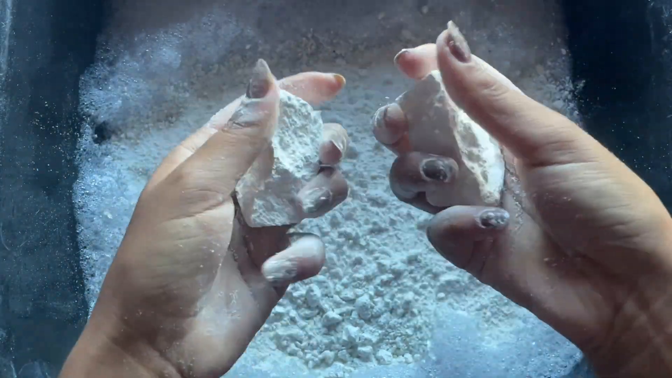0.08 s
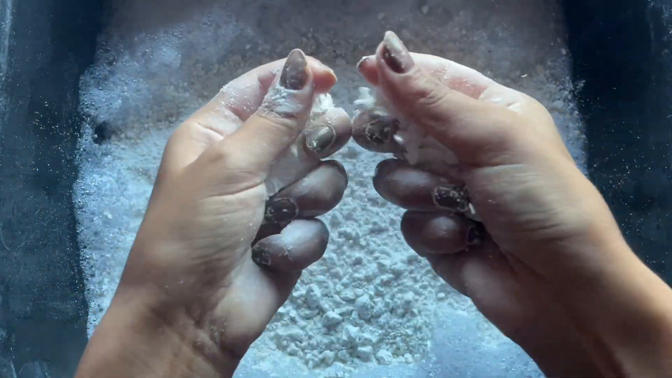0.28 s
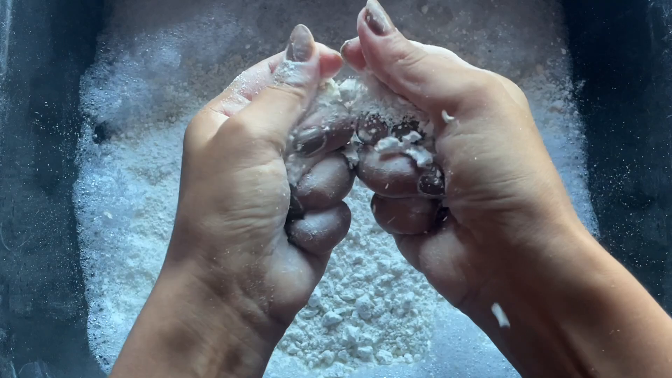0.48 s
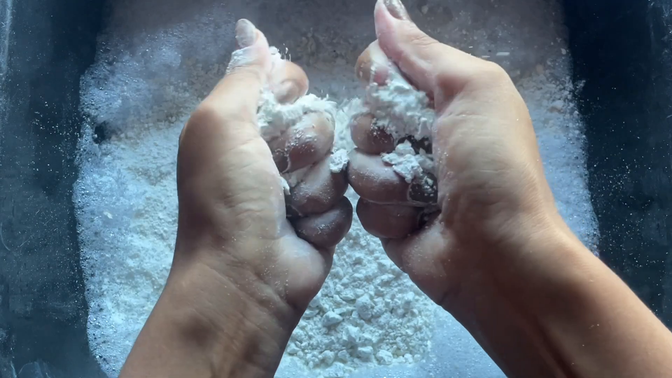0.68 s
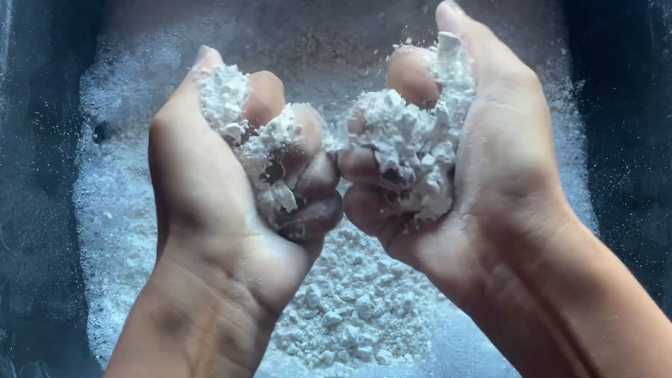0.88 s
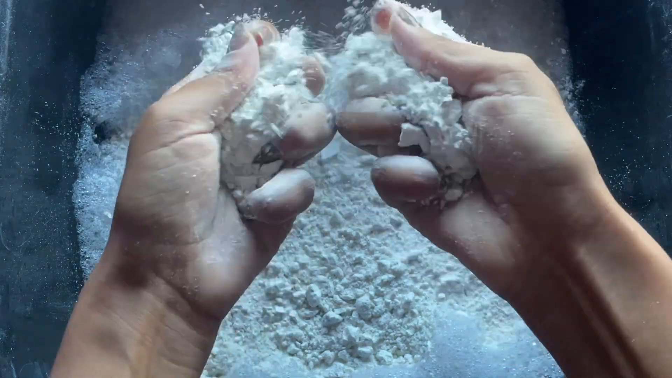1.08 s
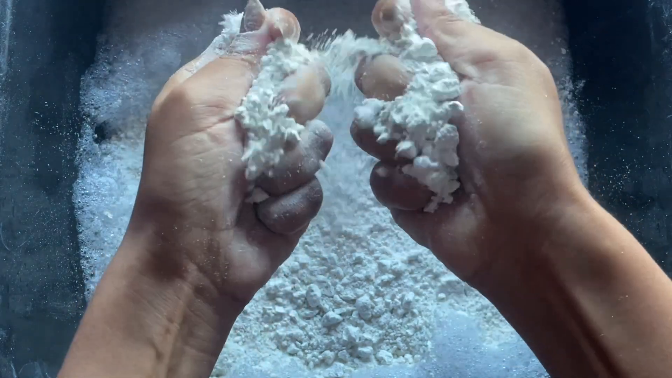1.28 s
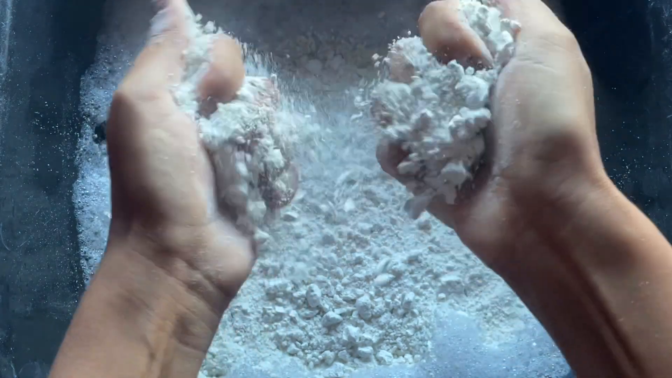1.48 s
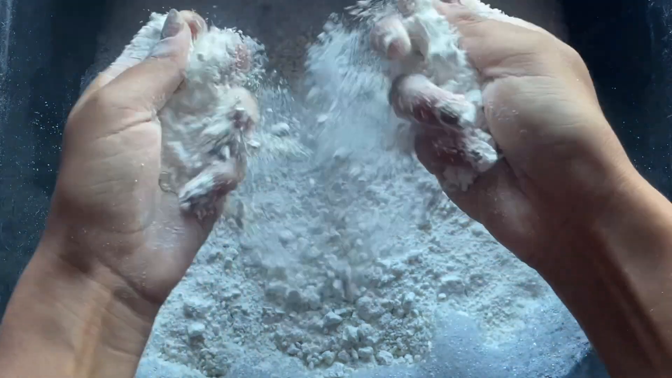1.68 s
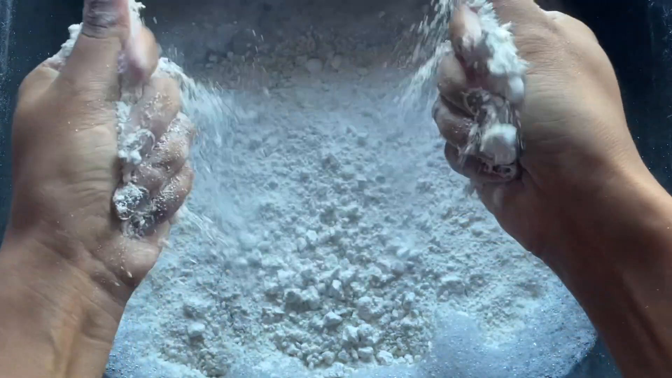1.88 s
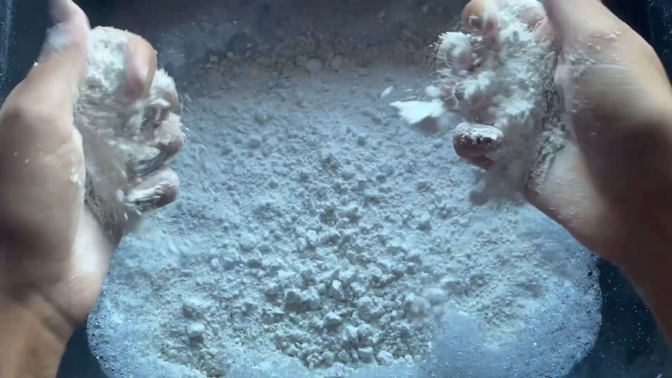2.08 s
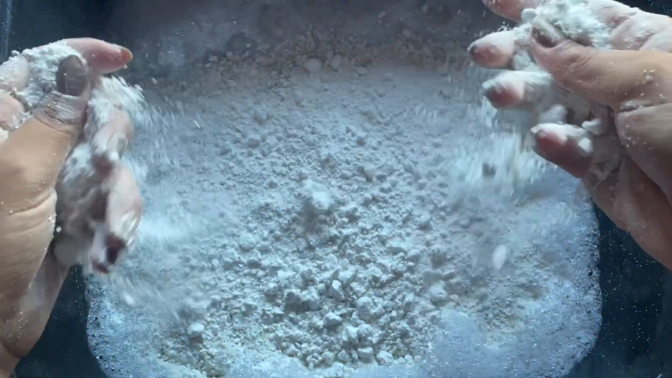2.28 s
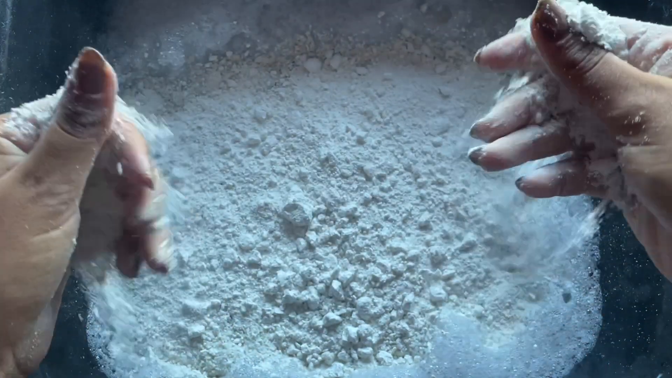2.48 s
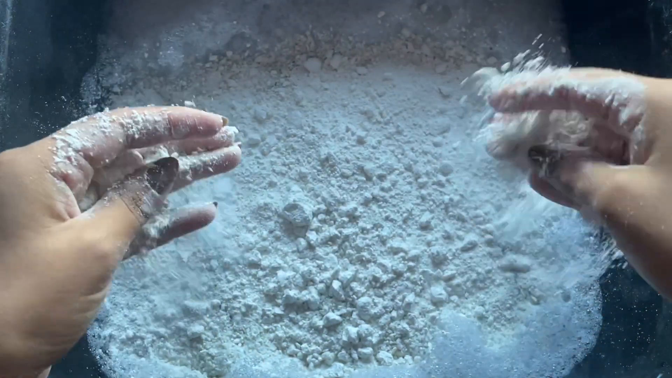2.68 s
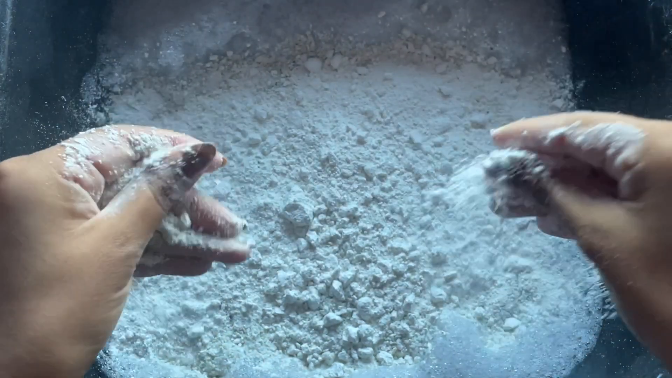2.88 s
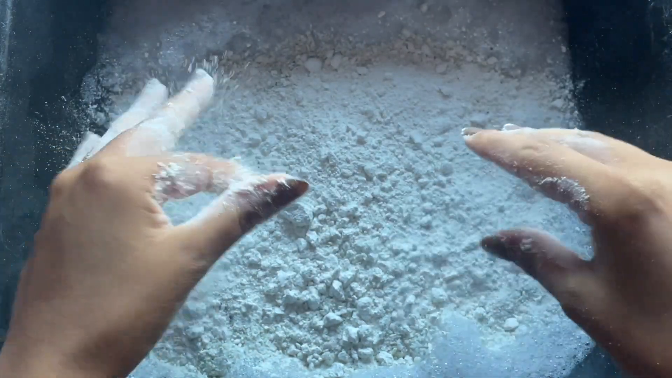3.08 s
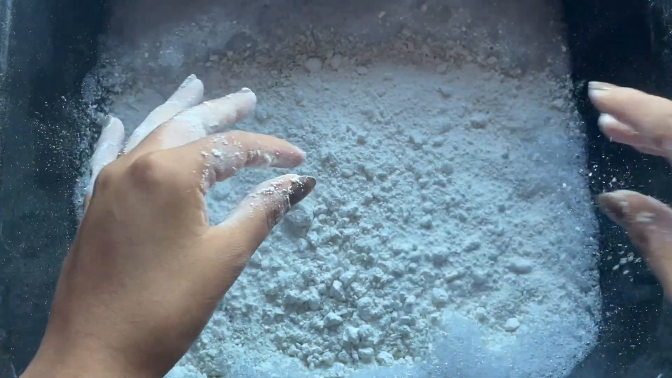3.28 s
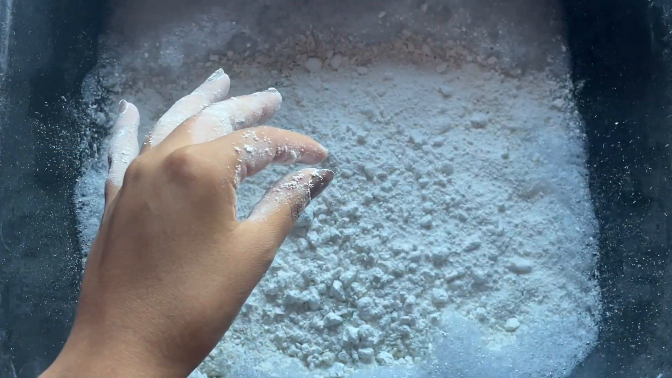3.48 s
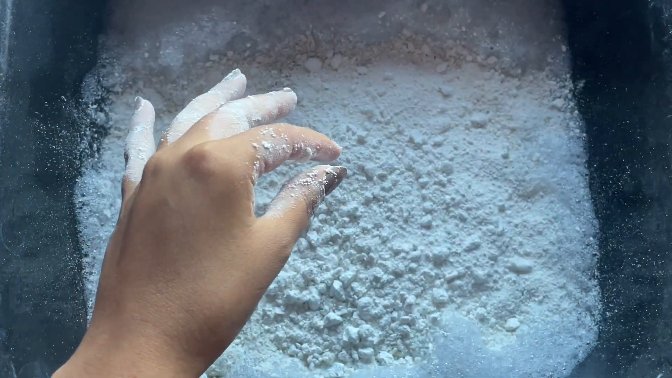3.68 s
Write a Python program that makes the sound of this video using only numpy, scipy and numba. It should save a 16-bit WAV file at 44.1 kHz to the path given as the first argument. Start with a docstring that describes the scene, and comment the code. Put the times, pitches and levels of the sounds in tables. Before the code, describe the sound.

Crunchy snaps of powder clumps come first, a few softer cracks follow, then a grainy rush of falling powder with crackle and low thumps, heard close in a small room.

```python
"""Clumps of damp powder snap, then crumble and sift down while foamy paste fizzes on beneath them.
Crumbs patter on the heap and heavier lumps land with muffled thumps, in a small room, close to the microphone.
Foam, sifting, patter and rubbing are showers of tiny fading tones; crackle is clicks and a puff is shaped hiss.
Each snap is a burst of noise that rings a clump, followed by a knock; thumps are low swinging tones over a rumble.
"""
import sys
import numpy as np
from scipy import signal
from scipy.fft import rfft, irfft, next_fast_len
from scipy.io import wavfile
from scipy.ndimage import uniform_filter1d
from numba import njit

SR = 44100
rng = np.random.default_rng(int(sys.argv[2]) if len(sys.argv) > 2 else 0)


def waveform_to_disk(signal):
    """Save audio, clipped to [-1, 1], as 16-bit WAV at the path in sys.argv[1]."""
    frames = np.transpose(np.atleast_2d(signal))
    scaled = np.clip(frames, -1, 1) * 32767
    samples = np.round(scaled).astype(np.int16)
    wavfile.write(sys.argv[1], SR, samples)


N = 165375  # length in samples

# In every colour table the dB are relative: only the shape of the curve counts.
# Bursting foam bubbles. Each row: frequency in Hz, colour in dB.
FOAM_COLOUR = [(200, -16.5), (700, -13.5), (1200, -4.5), (2100, 1.5), (3500, -3.5), (5000, -9), (7000, -20),
               (10000, -25.5), (14000, -57)]
FOAM_DB, FOAM_POPS_PER_S, FOAM_SPREAD_DB = -54.5, 6000, 3.5

# Low rumble of the tub. Each row: time in seconds, level in dB.
RUMBLE_LEVEL = [(0, -57.5), (.35, -51.5), (.8, -56.5), (1.3, -54), (2.0, -53.5), (2.9, -57), (3.4, -51.5),
                (3.75, -60.5)]
# Colour of that rumble. Each row: frequency in Hz, colour in dB.
RUMBLE_COLOUR = [(15, -44), (32, -14), (48, -2.5), (64, 0.5), (90, -8), (140, -12), (210, -18.5),
                 (500, -40), (2000, -52.5)]
RUMBLE_SIDE_DB = -15.5  # left-right difference, relative to the shared part

# Crumbs pattering on the heap. Each row: time in seconds, level in dB.
PATTER_LEVEL = [(0, -64), (.19, -68.5), (.3, -57), (.45, -64), (.62, -64), (.8, -61), (.96, -60.5),
                (1.19, -53), (1.44, -58), (1.66, -55.5), (1.98, -54), (2.15, -61), (2.28, -49.5),
                (2.55, -50.5), (2.9, -64), (3.22, -55.5), (3.48, -68.5), (3.75, -63.5)]
# Colour of the patter. Each row: frequency in Hz, colour in dB.
PATTER_COLOUR = [(100, -14.5), (220, -6.5), (310, -3), (420, -3.5), (560, -2.5), (720, -7.5), (1300, -14),
                 (3000, -21), (9000, -76)]

# Palms rubbing the damp powder. Each row: time in seconds, level in dB, pitch of their hollow in Hz.
RUBBING = [(0, -70.5, 395), (.5, -77, 380), (.63, -59.5, 385), (.9, -74, 410), (1.25, -65, 433),
           (1.36, -57.5, 338), (1.52, -64, 442), (1.72, -58.5, 392), (2.0, -59, 409), (2.45, -77, 413),
           (2.8, -56.5, 440), (2.9, -66, 502), (2.98, -55, 554), (3.1, -60.5, 543), (3.2, -54.5, 445),
           (3.5, -100, 524)]
# How slowly a slip fades (in cycles), slips per second, and pitch scatter (as a fraction, roughly).
RUB_CYCLES, RUB_SLIPS_PER_S, RUB_PITCH_SCATTER = 8, 600, .05

# A wisp of dust as the fingers close: middle and width in seconds, level in dB.
PUFF_S, PUFF_WIDTH_S, PUFF_DB = 0.067, 0.013, -62
# Hiss of the finest dust. Each row: frequency in Hz, colour in dB.
FINE_DUST_COLOUR = [(2000, -30), (5000, -2), (8500, 11), (11000, -4), (14000, -17)]

# Snaps of the clumps. Each row: start in seconds, bright crack in dB, drive of the clump's ring in dB,
# pitch of the clump in Hz, knock in dB, pitch of the knock in Hz.
SNAPS = [(0.2077, -36, -17, 990, -23, 365), (.22, -32, -28, 1880, -32, 416),
         (0.2344, -25, -19, 1510, -23, 365.5), (0.2599, -57, -39, 1340, -31, 333),
         (.28, -22, -28.5, 2500, -30.5, 276), (0.2896, -37, -27, 1430, -44, 412),
         (.297, -39, -33, 950, -33.5, 324), (0.3161, -32, -31.5, 1360, -40, 348),
         (0.3216, -28.5, -37, 1510, -36, 365), (0.399, -28.5, -35, 2460, -55, 374),
         (0.417, -39, -37, 2280, -45, 373), (0.546, -34, -29.5, 1190, -38.5, 572),
         (0.584, -50, -50, 1200, -36, 413), (0.682, -46, -35, 1270, -38.5, 366),
         (1.072, -39, -34, 900, -57, 416), (1.173, -35, -31, 980, -34, 394),
         (1.256, -37, -43, 2000, -37.5, 486)]
# Colour of the crack. Each row: frequency in Hz, colour in dB.
CRACK_COLOUR = [(400, -26), (1500, 5), (3600, 8), (4900, -14), (6800, -18), (9000, -31), (14000, -45)]
SNAP_RISE_S, SNAP_DECAY_S = 0.00065, .0009
CHIPS_DB, CHIPS_DECAY_S = -18, .007  # spray of chips, relative to the snap itself
# Resonances of a breaking clump. Each row: multiple of its pitch, sharpness Q, strength in dB.
CLUMP_RESONANCES = [(1, 2.1, 13), (2.27, 21, 8), (3.57, 23, 10), (6.3, 9.8, -6)]
# Damp powder muffling the high resonances. Each row: frequency in Hz, gain in dB.
CLUMP_DAMPING = [(3800, 1), (5200, -27), (10000, -40)]
CLUMP_TOP_HZ = 7540  # the soft damp surface radiates little above this
# Hollow of the cupped hands. Each row: multiple of the knock's pitch, dB added to the knock,
# time to fall by 60 dB in seconds.
HAND_HOLLOW = [(.8, -19, 0.1), (1, 1.5, 0.023), (1.4, -15, 0.087)]
KNOCK_LAG_S, KNOCK_RISE_S = 0.00198, 0.0014
KNOCK_PITCH_SCATTER = .015  # as a fraction
SNAP_ROOM_DB = -2.5  # the snaps are nearer the microphone than the heap

# Flow of sifting powder. Each row: time in seconds, level in dB.
SIFT_FLOW = [(0, -109), (.2, -56), (.3, -55.5), (.5, -61), (1.0, -73), (1.18, -53.5), (1.35, -63.5),
             (1.68, -57), (1.82, -48), (1.97, -46), (2.04, -52.5), (2.19, -52), (2.27, -45), (2.49, -41),
             (2.61, -49), (2.8, -46), (3.05, -52), (3.2, -49), (3.47, -55.5), (3.53, -69), (3.75, -71)]
# Colour of the sifting. Each row: frequency in Hz, colour in dB.
SIFT_COLOUR = [(260, -7), (730, -5), (1300, 0.5), (1650, 1), (2220, 5.5), (2500, 0.5), (2750, 5),
               (3100, 0.5), (5000, -6.5), (7200, -13.5), (10000, -50), (14000, -60)]
SIFT_LEFT_DB = 0.25  # left louder than right
SPRAY_DB = -15  # finest dust relative to the sifting, at the strongest flow

# Colour of the crackle. Each row: frequency in Hz, colour in dB.
CRACKLE_COLOUR = [(600, -12), (2100, 3.5), (3500, 4), (6000, -5.5), (10000, -35.5)]
CRACKLE_TICKS_PER_S, CRACKLE_SPREAD_DB = 450, 4.5
# Level of one layer at the strongest flow, and the share of the flow's dB that it follows.
CRACKLE_DB, CRACKLE_FOLLOW = -53, 0.49

# Lumps landing and hands bumping. Each row: start in seconds, level in dB, pitch in Hz.
THUMPS = [(0.27, -42, 103), (.296, -47, 68.5), (0.325, -46, 141), (0.604, -39, 64), (1.013, -32, 64),
          (1.171, -33.5, 51.8), (1.215, -40, 59), (1.335, -41, 57.7), (1.519, -43, 64), (1.973, -43, 69),
          (2.722, -43, 74), (3.178, -28.5, 62.4), (3.279, -33, 52.4), (3.35, -34.5, 48)]
THUMP_PEAK_S, THUMP_SHAPE = 0.023, 3.9  # a larger shape makes the swell narrower
THUMP_OVERTONE, THUMP_OVERTONE_DB = 2.136, -17.5  # multiple of the pitch, level relative to it

# Colour of the room's tail. Each row: frequency in Hz, colour in dB.
ROOM_COLOUR = [(100, 18), (330, 3.5), (600, 6), (1000, 4), (1600, 7.5), (2500, -1), (6000, -28),
               (14000, 0.5)]
ROOM_T60_S, ROOM_DB = 0.16, -5.5  # time to fall by 60 dB; strength before the tail is halved

# Level balance of the microphone pair. Each row: frequency in Hz, left minus right in dB.
PORT_BALANCE = [(200, 0), (550, -.8), (1000, 1), (1450, 1.5), (1730, -2.6), (2100, 1.7), (2700, 1.9),
                (4000, .6), (8000, 0)]
# Phase between the pair. Each row: frequency in Hz, lead of the left in radians.
PORT_PHASE = [(0, 0), (5700, 0), (6900, -.9), (8250, -3.14), (9800, -4.5), (11000, -5.6)]
TOP_HZ = 13300


def undb(db):
    """Decibels to gain."""
    return 10 ** (np.asarray(db) / 20)


def unit(x):
    """Scale to an average strength (rms) of 1."""
    return x / np.sqrt(np.mean(x ** 2))


def curve(rows):
    """Gain over time, joined up from (seconds, dB) points."""
    return undb(np.interp(np.arange(N) / SR, *np.array(rows).T))


def response(rows, f):
    """Gain at frequencies f, joined up from (Hz, dB) points."""
    hz, db = np.array(rows).T
    return undb(np.interp(np.log(f + 1e-6), np.log(hz), db))


def colour(x, rows):
    """Filter to the given colour without sounding early; white noise keeps its power."""
    size = 2 * next_fast_len(N)
    gain = unit(response(rows, np.fft.rfftfreq(size, 1 / SR)))
    # Folding the cepstrum forward in time puts the filter's energy as early as possible.
    cepstrum = irfft(np.log(gain))
    cepstrum[1:size // 2] *= 2
    cepstrum[size // 2 + 1:] = 0
    return irfft(rfft(x, size) * np.exp(rfft(cepstrum)))[..., :N]


def walk(rate):
    """Smooth random wander with a spread of 1, taking about `rate` steps a second."""
    step = max(int(SR / rate), 2)
    held = np.repeat(rng.standard_normal(N // step + 1), step)
    return unit(uniform_filter1d(held, step)[:N])


def add(out, start_s, x):
    """Mix a short sound in at its time."""
    i = int(start_s * SR)
    out[i:i + len(x)] += x[:max(N - i, 0)]


@njit
def ring(start, hz, cycles, size, pan):
    """Each grain is a tiny fading oscillation at its own place between left and right."""
    out = np.zeros((2, N))
    for k in range(len(start)):
        turn = np.exp((2j * np.pi - 1 / cycles[k]) * hz[k] / SR)  # one sample of turning and fading
        z = size[k] + 0j
        end = min(N, start[k] + int(6 * cycles[k] * SR / hz[k]))
        for i in range(start[k], end):
            z *= turn
            out[0, i] += z.imag * (1 + pan[k])
            out[1, i] += z.imag * (1 - pan[k])
    return out


def grains(per_s, spread_db, cycles, low_hz, high_hz, width):
    """A shower of grains, many small and a few large, with a roughly flat spectrum."""
    when, pitch, big, length, side, sign = rng.random((int(per_s * N / SR), 6)).T
    hz = low_hz * (high_hz / low_hz) ** pitch
    strength = -np.log(1 - .99 * big)
    size = undb(spread_db * strength) * hz * np.sign(sign - .5)
    start = (when * N).astype(np.int64)
    return ring(start, hz, cycles * (.5 + length), size, width * (2 * side - 1))


def foam():
    """Bubbles burst all over the wet paste, each a very short ringing pop; the fizz flutters."""
    pops = grains(FOAM_POPS_PER_S, FOAM_SPREAD_DB, cycles=1.55, low_hz=706, high_hz=12250, width=0.11)
    flutter = undb(2.0 * walk(35))
    return undb(FOAM_DB) * unit(colour(pops, FOAM_COLOUR)) * flutter


def rumble():
    """The tub rumbles: low noise, mostly shared by both sides."""
    noise = colour(rng.standard_normal((2, N)), RUMBLE_COLOUR)
    mid, side = unit(noise) * curve(RUMBLE_LEVEL)
    return mid + undb(RUMBLE_SIDE_DB) * side * np.array([[1], [-1]])


def patter():
    """Crumbs drop softly all over the heap, each a small low-pitched ring."""
    crumbs = grains(per_s=800, spread_db=3.5, cycles=2.64, low_hz=225.2, high_hz=1916, width=0.38)
    return unit(colour(crumbs, PATTER_COLOUR)) * curve(PATTER_LEVEL)


def rubbing():
    """Small slips of powder on skin sound the hollow of the palms, which is higher as the hands open."""
    time_s, db, hollow_hz = np.array(RUBBING).T
    count = int(RUB_SLIPS_PER_S * N / SR)
    when = rng.random(count)
    detune, size, pan = rng.standard_normal((count, 3)).T
    pitch = np.interp(when * N / SR, time_s, hollow_hz) * np.exp(RUB_PITCH_SCATTER * detune)
    start = (when * N).astype(np.int64)
    cycles = np.full(count, float(RUB_CYCLES))
    slips = ring(start, pitch, cycles, size.copy(), 0.12 * pan)
    return unit(slips) * curve(np.c_[time_s, db])


def puff():
    """A brief, faint hiss of the finest dust, swelling and fading smoothly."""
    swell = np.exp(-((np.arange(N) / SR - PUFF_S) / PUFF_WIDTH_S) ** 2 / 2)
    hiss = unit(colour(rng.standard_normal(N), FINE_DUST_COLOUR))
    return undb(PUFF_DB) * swell * hiss


def burst(envelope):
    """A run of tiny fractures under the envelope, even across all frequencies."""
    size = 2 * len(envelope)
    spectrum = rfft(envelope * rng.standard_normal(len(envelope)), size)
    even = irfft(spectrum / np.abs(spectrum))[:len(envelope)]
    return even * np.sqrt(np.sum(envelope ** 2))


def clump(x, pitch):
    """The few resonances of one clump, rung by x; a smaller piece rings higher."""
    out = np.zeros(len(x))
    for multiple, q, db in CLUMP_RESONANCES:
        hz = min(pitch * multiple, SR / 4)
        resonance = signal.lfilter(*signal.iirpeak(hz, q, fs=SR), x)
        out += undb(db) * response(CLUMP_DAMPING, hz) * resonance
    return signal.sosfilt(signal.butter(4, CLUMP_TOP_HZ, fs=SR, output="sos"), out)


def snaps():
    """A clump breaks: a sharp crack and a spray of chips ring the piece, then the cupped hands knock."""
    t = np.arange(SR // 8) / SR
    rise = np.minimum(t / SNAP_RISE_S, 1)
    sharp = np.exp(-np.maximum(t - SNAP_RISE_S, 0) / SNAP_DECAY_S)
    chips = undb(CHIPS_DB) * np.exp(-t / CHIPS_DECAY_S)
    envelope = rise * (sharp + chips) / 2
    cracks, bodies = np.zeros((2, N))
    for start, crack_db, ring_db, clump_hz, knock_db, knock_hz in SNAPS:
        add(cracks, start, undb(crack_db) * burst(envelope))
        add(bodies, start, undb(ring_db) * clump(burst(envelope), clump_hz))
        for multiple, db, t60 in HAND_HOLLOW:
            pitch = knock_hz * multiple * (1 + KNOCK_PITCH_SCATTER * rng.standard_normal())
            fade = np.minimum(t / KNOCK_RISE_S, 1) * np.exp(-np.log(1000) * t / t60)
            knock = np.sin(2 * np.pi * pitch * t) * fade
            add(bodies, start + KNOCK_LAG_S, undb(knock_db + db) * knock)
    return colour(cracks, CRACK_COLOUR) + bodies


def sifting():
    """Fine powder grinds between the fingers and showers down; a strong flow sprays brighter."""
    dust = grains(per_s=24000, spread_db=3.0, cycles=1.23, low_hz=504, high_hz=13200, width=0.26)
    flow = curve(SIFT_FLOW)
    hiss = unit(colour(rng.standard_normal(N), FINE_DUST_COLOUR))
    spray = undb(SPRAY_DB) * np.sqrt(flow / flow.max()) * hiss
    flutter = undb(0.87 * walk(70))
    lean = undb(np.array([[1], [-1]]) * SIFT_LEFT_DB / 2)
    return (unit(colour(dust, SIFT_COLOUR)) + spray) * flow * flutter * lean


def crackle():
    """Single crumbs break off with tiny sharp ticks, in irregular clusters, louder in a strong flow."""
    when, big, sign = rng.random((int(CRACKLE_TICKS_PER_S * N / SR), 3)).T
    strength = -np.log(1 - .97 * big)
    size = undb(CRACKLE_SPREAD_DB * strength) * np.sign(sign - .5)
    ticks = np.bincount((when * N).astype(int), size, N)
    clustered = unit(colour(ticks, CRACKLE_COLOUR) * undb(2 * walk(40)))
    flow = curve(SIFT_FLOW)
    return undb(CRACKLE_DB) * clustered * (flow / flow.max()) ** CRACKLE_FOLLOW


def thumps():
    """Heavy lumps push the floor of the tub, which swings a few times at a low pitch."""
    t = np.arange(SR // 5) / SR
    swell = (t / THUMP_PEAK_S * np.exp(1 - t / THUMP_PEAK_S)) ** THUMP_SHAPE
    out = np.zeros(N)
    for start, db, hz in THUMPS:
        overtone = undb(THUMP_OVERTONE_DB) * np.sin(2 * np.pi * THUMP_OVERTONE * hz * t)
        swing = np.sin(2 * np.pi * hz * t) + overtone
        add(out, start, undb(db) * swell * swing)
    return out


def room(x):
    """A short diffuse tail of fading noise, different on each side."""
    t = np.arange(N) / SR
    fade = np.exp(-np.log(1000) * t / ROOM_T60_S) * (t > .004)  # silent until the first reflections
    tail = colour(rng.standard_normal((2, N)) * fade, ROOM_COLOUR)
    tail = tail / np.sqrt(np.sum(tail ** 2) / 2) / 2
    return undb(ROOM_DB) * signal.fftconvolve(x.mean(0)[None], tail, axes=1)[:, :N]


def scene():
    """Hands, powder and foam in the room, over the low thuds and rumble of the tub."""
    powder = foam() + patter() + rubbing() + puff() + sifting()
    powder = powder + crackle() + crackle()  # two independent layers of ticks
    breaks = snaps()
    echoes = room(powder + undb(SNAP_ROOM_DB) * breaks)
    return breaks + powder + echoes + rumble() + thumps()


def record(dry):
    """The two microphone ports differ in level and treble phase; the top is cut."""
    f = np.fft.rfftfreq(2 * N, 1 / SR)
    tilt = np.sqrt(response(PORT_BALANCE, f))  # half the difference goes to each side
    lead = np.exp(1j * np.interp(f, *np.array(PORT_PHASE).T))
    heard = irfft(rfft(dry, 2 * N) * np.array([tilt * lead, 1 / tilt]))[:, :N]
    return signal.sosfilt(signal.ellip(8, .2, 70, TOP_HZ, fs=SR, output="sos"), heard)


dry = scene()
out = record(dry)
waveform_to_disk(out)
```